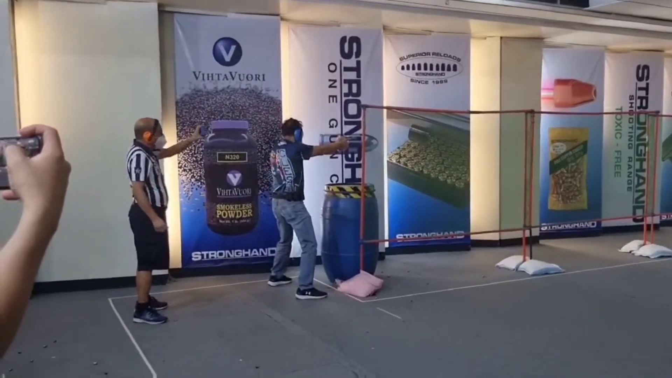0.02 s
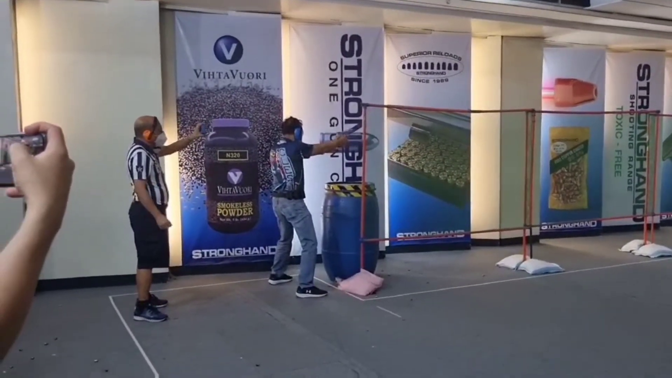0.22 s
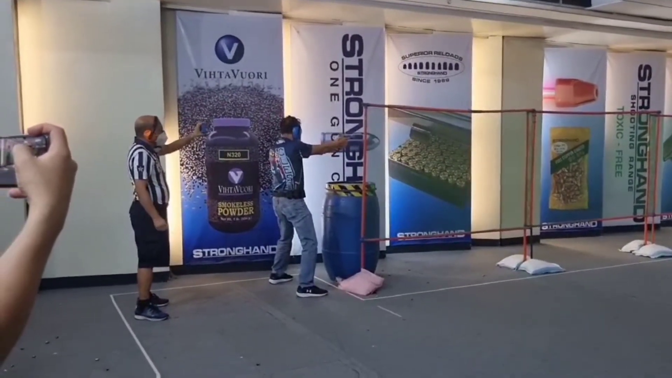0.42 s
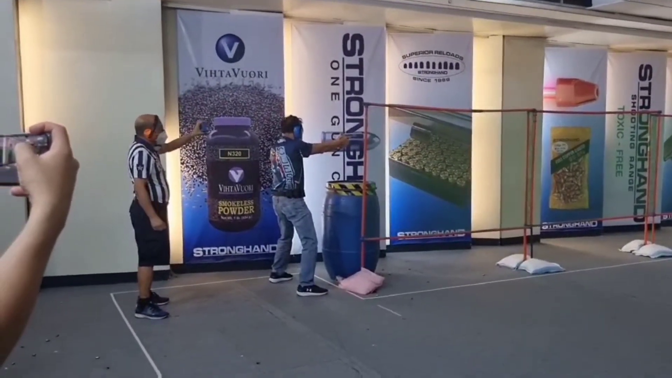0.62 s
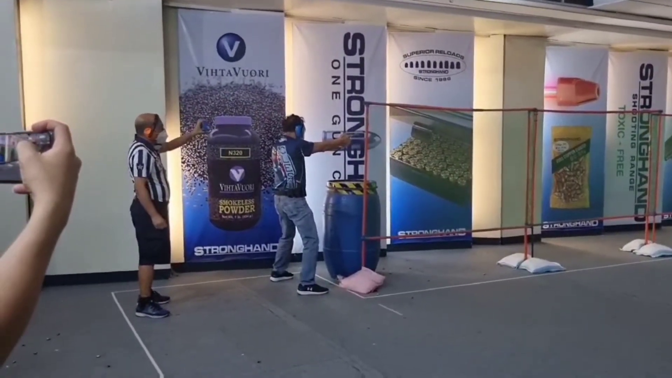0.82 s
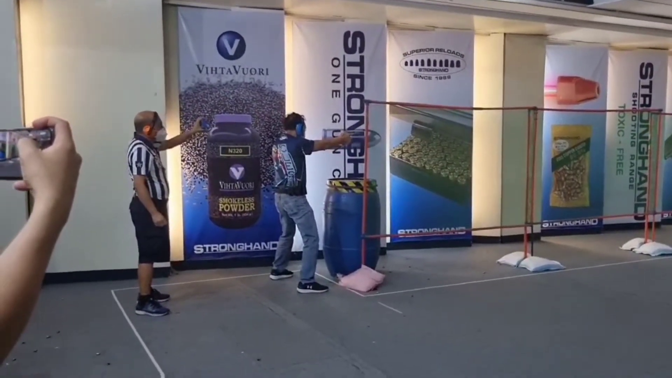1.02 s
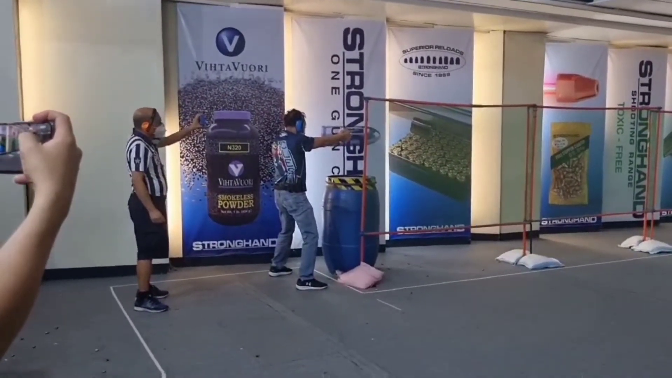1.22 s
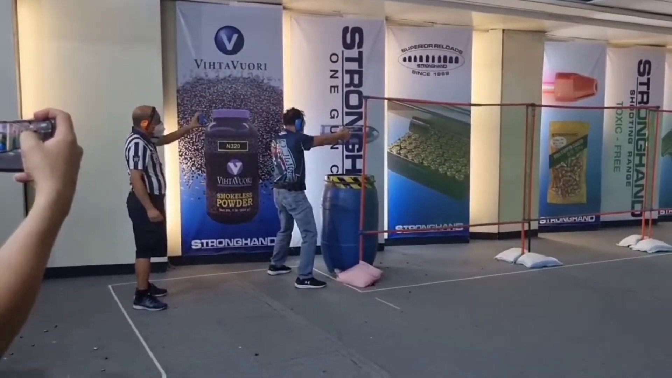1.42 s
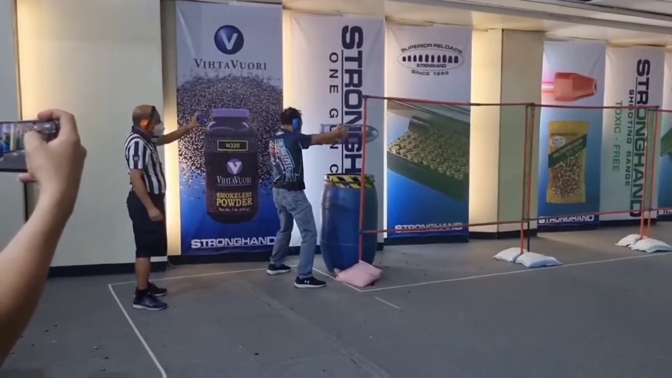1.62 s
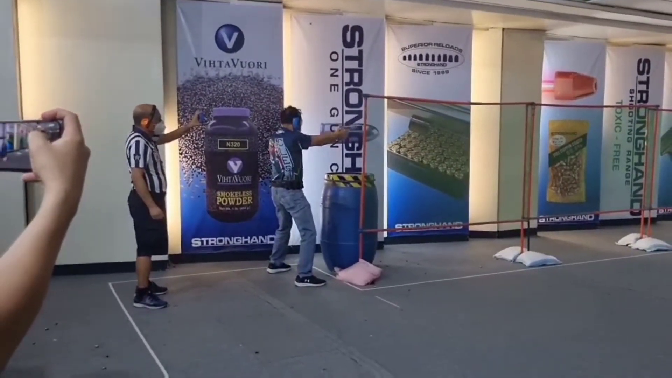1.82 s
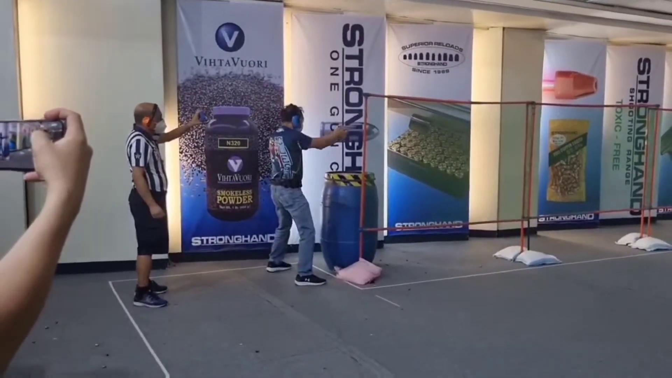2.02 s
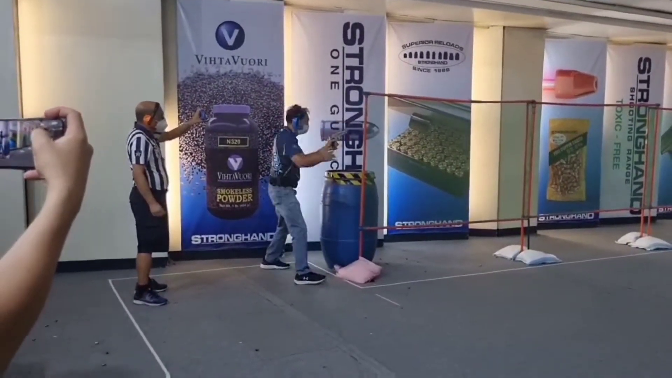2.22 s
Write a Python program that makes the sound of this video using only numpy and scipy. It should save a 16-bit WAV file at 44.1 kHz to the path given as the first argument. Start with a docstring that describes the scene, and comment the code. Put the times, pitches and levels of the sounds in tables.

```python
"""A long concrete hall, two pistol shots, heard on a phone. Each blast rings the microphone ports,
cracks off near walls and fills the hall with a dense roar; a far wall returns a faint slap.
The phone's limiter flattens the roar before it dies away. A dull far knock precedes the second shot.
Behind: ventilation air and hum, a brief late hiss, and background noise that swells before the
first shot, drops away and rises near the end."""
import sys
import numpy as np
from scipy import signal
from scipy.fft import rfft, irfft, next_fast_len
from scipy.io import wavfile
from scipy.ndimage import uniform_filter1d, map_coordinates

SR = 44100
rng = np.random.default_rng(int(sys.argv[2]) if len(sys.argv) > 2 else 0)


def generate_wav(signal):
    """Clip the signal to [-1, 1] and save it as 16-bit WAV at the path in sys.argv[1]."""
    frames = np.transpose(np.atleast_2d(signal))
    scaled = np.clip(frames, -1, 1) * 32767
    pcm = np.round(scaled).astype(np.int16)
    wavfile.write(sys.argv[1], SR, pcm)


N = 101430

# Events. Each row: start in seconds, base level in dB.
SHOT_EVENTS = [(0.247, -8.5), (1.562, -8)]
KNOCK_EVENTS = [(1.429, -34)]
# Noise spectra. Each row: frequency in Hz, relative density in dB.
CRACK_SPECTRUM = [(300, -32), (600, -4.5), (750, 7), (950, -6), (2000, -14), (5000, -10), (12000, -22.5),
                  (16000, -40)]
ROAR_SPECTRUM = [(30, -26), (70, -19), (130, -14), (200, -7.5), (330, -4), (500, -4), (750, -3),
                 (950, -4.5), (1300, -6.5), (1750, -6), (2050, -4.5), (2250, -0.5), (2500, -3), (2750, -4),
                 (3100, -6.5), (3700, -9.5), (6000, -16.5), (8000, -18), (10000, -23), (13000, -16.5),
                 (15000, -29), (16000, -49.5)]
SLAP_SPECTRUM = [(150, -33), (400, -35), (800, 7), (2400, 7), (6000, -11.5), (12000, -17.5), (15000, -25),
                 (16000, -31.5)]
KNOCK_SPECTRUM = [(400, -34), (700, -18), (1200, -3.5), (1600, -9), (2100, -5), (2700, -17.5), (4000, -23),
                  (5500, -41)]
BACKGROUND_SPECTRUM = [(24, -41), (40, -10), (112, -15), (140, -10.5), (433, -10), (585, -16.5),
                       (2210, -17.5), (14100, -41), (16000, -65.5)]
HISS_SPECTRUM = [(5000, -29), (9000, -10.5), (13000, -3.5), (15000, -15), (16000, -32.5)]
AIR_SPECTRUM = [(20, -22.5), (50, -4.5), (90, -9), (150, -14.5), (300, -17.5), (600, -22.5), (850, -21.5),
                (1400, -23.5), (2300, -18.5), (3200, -28), (7700, -31.5), (10000, -41.5), (14000, -38.5),
                (16000, -62.5)]
# Reverberation. Each row: frequency in Hz, late T60 in seconds.
HALL_T60_S = [(60, 1.22), (200, 0.7), (400, 0.74), (750, 0.76), (1300, 0.69), (2300, 0.72), (5000, 0.57),
              (9000, 0.53), (15000, 0.33)]
KNOCK_TAIL_T60_S = [(1000, 0.24), (2100, 0.44), (4000, 0.19)]
# Time the walls keep feeding the roar. Each row: frequency in Hz, hold in seconds.
HALL_HOLD_S = [(100, 0.06), (250, 0.18), (500, 0.17), (1000, 0.21), (2300, 0.16), (6000, 0.17), (13000, .1)]
# Envelopes. Each row: time in seconds, level in dB.
BACKGROUND_ENVELOPE = [(0, -49), (.03, -52), (.12, -48), (.21, -44), (.26, -42.5), (.5, -76.5),
                       (2.05, -56.5), (2.14, -65), (2.2, -48), (2.3, -52.5)]
HISS_ENVELOPE = [(1.98, -75), (2.02, -59), (2.06, -62), (2.1, -78), (2.3, -98)]
# Ventilation tones. Each row: frequency in Hz, base level in dB.
HUM_LINES = [(113.0, -57.5), (253.0, -72.5), (328.4, -76), (382.2, -73), (543.7, -78.5), (818.3, -78)]
# Stereo likeness. Each row: frequency in Hz, left-right correlation.
COHERENCE = [(40, .3), (90, .4), (150, .92), (290, .9), (640, .62), (1400, 0), (15000, 0)]
# Stereo balance. Each row: frequency in Hz, left over right in dB.
BALANCE_DB = [(40, -1), (120, 0), (400, 1.5), (800, 1.5), (1300, 1), (1900, -3.5), (2400, -7), (3200, 1.5),
              (5000, -3.5), (8000, 0.5), (15000, -2)]


def blast(start_s, pulse_s=0.0001):
    """Muzzle pulse: pressure jump, then shallow suction."""
    u = elapsed_s(start_s) / pulse_s
    return (u > 0) * (1 - u) * np.exp(-u)


def port_ring(start_s, hz=2494, t60_s=0.061, left_right_db=(-1.5, -2)):
    """The blast rings the cavity of each microphone port."""
    return np.outer(amp(left_right_db), damped_sine(elapsed_s(start_s), hz, t60_s))


def crack(start_s, t60_s=0.17):
    """Fast reflections off near walls."""
    return decay(diffuse_noise(CRACK_SPECTRUM, patchy_db=2.5), start_s, t60_s, hold_s=0.01)


def roar(start_s):
    """Dense hall reverberation, fed by the walls before it dies."""
    return decay(diffuse_noise(ROAR_SPECTRUM, patchy_db=1), start_s, HALL_T60_S, HALL_HOLD_S)


def slap(start_s, delay_s=0.34, t60_s=0.68):
    """Late return of the roar from a far wall."""
    return decay(diffuse_noise(SLAP_SPECTRUM, patchy_db=3.5), start_s + delay_s, t60_s, hold_s=0.034)


def shots():
    """Each pistol shot: direct sound plus the hall's response."""
    out = np.zeros((2, N))
    for start_s, db in SHOT_EVENTS:
        out += amp(db - 2) * blast(start_s)
        out += amp(db) * port_ring(start_s)
        out += amp(db - 4) * crack(start_s)
        out += amp(db + 2) * roar(start_s)
        out += amp(db - 27) * slap(start_s)
    return out


def knock(hz=1436, t60_s=0.019, attack_s=0.0013):
    """Dull far knock: brief ring, short wash behind it."""
    out = np.zeros((2, N))
    for start_s, db in KNOCK_EVENTS:
        t = elapsed_s(start_s)
        ring = damped_sine(t, hz, t60_s) * (1 - np.exp(-t / attack_s))
        wash = decay(diffuse_noise(KNOCK_SPECTRUM, patchy_db=2), start_s, KNOCK_TAIL_T60_S, hold_s=0.015)
        out += amp(db + 4.5) * ring + amp(db - 7.5) * wash
    return out


def background_noise():
    """Swells before the first shot, drops away, rises near the end."""
    level_db = np.interp(elapsed_s(0), *np.transpose(BACKGROUND_ENVELOPE))
    return amp(level_db) * diffuse_noise(BACKGROUND_SPECTRUM, patchy_db=1.5)


def hiss():
    """Brief treble hiss."""
    level_db = np.interp(elapsed_s(0), *np.transpose(HISS_ENVELOPE), left=-120)
    return amp(level_db) * diffuse_noise(HISS_SPECTRUM, patchy_db=3)


def ventilation_hum(drift_db=1.3, drift_rad=0.14):
    """Tones unsteady in level and phase."""
    out = np.zeros(N)
    for hz, db in HUM_LINES:
        gain = amp(db + 3.5 + drift_db * wobble(rate_hz=11))
        out += gain * np.sin(2 * np.pi * hz * elapsed_s(0) + drift_rad * wobble(rate_hz=8.9))
    return out


def ventilation_air(rms_db=-58):
    """Low, continuous rush of air."""
    return amp(rms_db) * diffuse_noise(AIR_SPECTRUM, patchy_db=2.5)


def diffuse_noise(spectrum, patchy_db):
    """Diffuse field at the two ports, rms 1, with random gain patches in time and frequency."""
    bins = signal.stft(rng.standard_normal((2, N)), nperseg=512)[2]
    patches = rng.standard_normal(bins.shape[1:])
    for axis in (0, 1):
        patches = uniform_filter1d(patches, size=6, axis=axis)
    pair = signal.istft(bins * amp(patchy_db * patches / patches.std()), nperseg=512)[1][:, :N]

    def mid_side_gain(hz):
        width_rad = np.arccos(np.clip(curve_at(COHERENCE, hz), -1, 1)) / 2
        return amp(curve_at(spectrum, hz)) * [np.cos(width_rad), np.sin(width_rad)]

    mid, side = filtered(pair, mid_side_gain)
    stereo = np.array([mid + side, mid - side])
    stereo = filtered(stereo, lambda hz: amp(np.outer([0.5, -0.5], curve_at(BALANCE_DB, hz))))
    return stereo / stereo.std()


def decay(x, start_s, t60_s, hold_s, attack_s=0.00054, bend_s=0.012, hold_speed=0.44):
    """Onset at start_s; each band sags slowly during its hold, then falls at its full T60 rate."""
    hz, t, bins = signal.stft(x, SR, nperseg=256)
    age_s = np.abs(t - start_s)
    past_hold_s = bend_s * np.logaddexp(0, (age_s - curve_at(hold_s, hz)[:, None]) / bend_s)
    decayed_s = hold_speed * age_s + (1 - hold_speed) * past_hold_s
    fall = amp(-60 * decayed_s / curve_at(t60_s, hz)[:, None])
    onset = 1 - np.exp(-elapsed_s(start_s) / attack_s)
    return signal.istft(bins * fall, SR, nperseg=256)[1][:, :N] * onset


def damped_sine(t, hz, t60_s):
    return np.sin(2 * np.pi * hz * t) * amp(-60 * t / t60_s)


def wobble(rate_hz):
    """Smooth curve through rate_hz random points a second."""
    return map_coordinates(rng.standard_normal(int(N * rate_hz / SR) + 4), [elapsed_s(0) * rate_hz])


def filtered(x, gain_at_hz):
    """Zero-phase FFT filter."""
    size = next_fast_len(N + 8192)
    return irfft(rfft(x, size) * gain_at_hz(np.fft.rfftfreq(size, 1 / SR)), size)[..., :N]


def curve_at(curve, hz):
    """A constant, or (Hz, value) rows interpolated over log frequency."""
    if np.isscalar(curve):
        return np.full_like(hz, curve)
    row_hz, values = np.transpose(curve)
    return np.interp(np.log(hz + 1), np.log(row_hz + 1), values)


def elapsed_s(start_s):
    return np.maximum(np.arange(N) / SR - start_s, 0)


def amp(db):
    return 10 ** (np.asarray(db) / 20)


def scene():
    return shots() + knock() + ventilation_hum() + background_noise() + hiss() + ventilation_air()


def record(dry):
    """Phone: limiter on short-time power, soft clip, band limit."""
    knee_db, ratio, window_s = -8, 2.54, 0.018
    ceiling, hardness, cutoff_hz = 1.25, 2.8, 16480
    power = np.abs(uniform_filter1d((dry ** 2).mean(0), round(window_s * SR)))
    limited = dry * (1 + power / amp(2 * knee_db)) ** ((1 / ratio - 1) / 2)
    clipped = limited / (1 + np.abs(limited / ceiling) ** hardness) ** (1 / hardness)
    return filtered(clipped, lambda hz: hz < cutoff_hz)


dry = scene()
out = record(dry)
generate_wav(out)
```